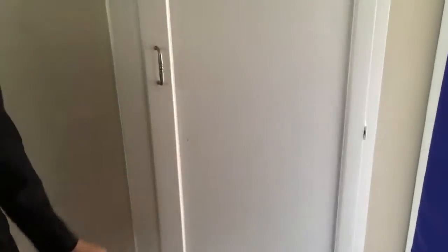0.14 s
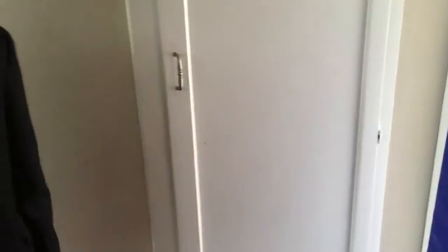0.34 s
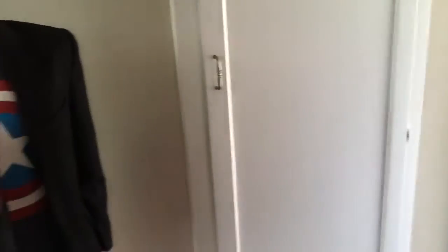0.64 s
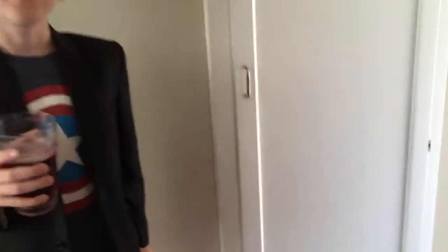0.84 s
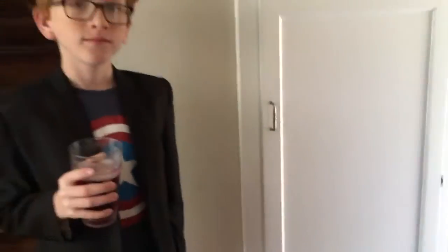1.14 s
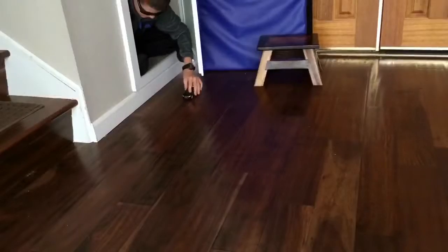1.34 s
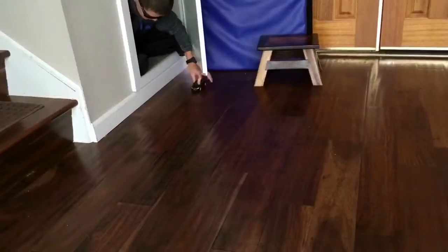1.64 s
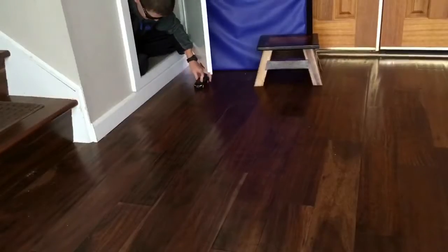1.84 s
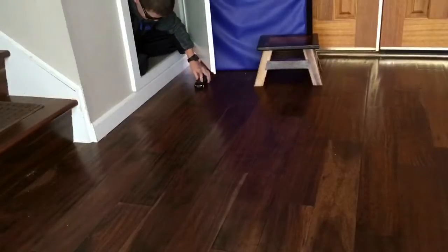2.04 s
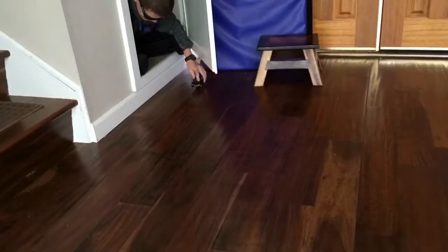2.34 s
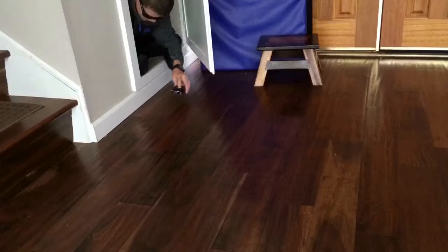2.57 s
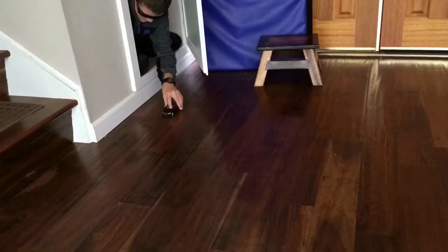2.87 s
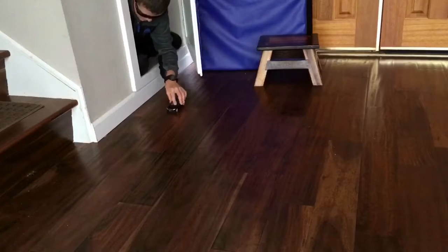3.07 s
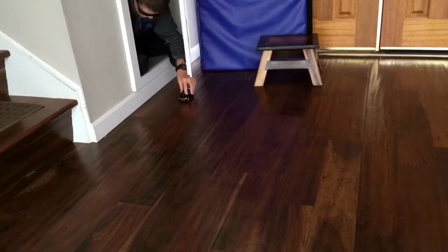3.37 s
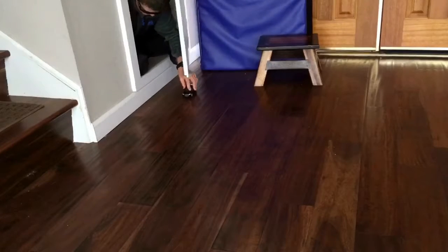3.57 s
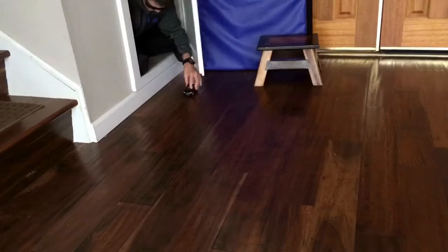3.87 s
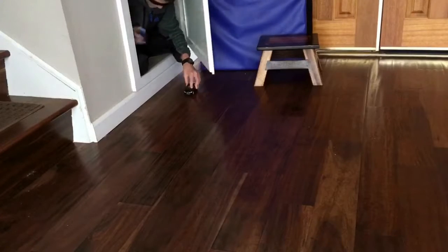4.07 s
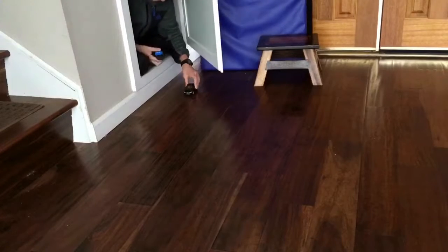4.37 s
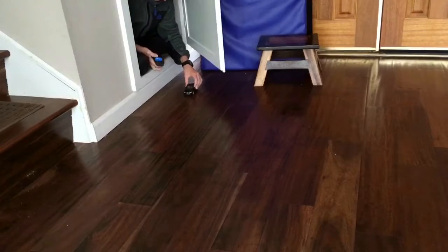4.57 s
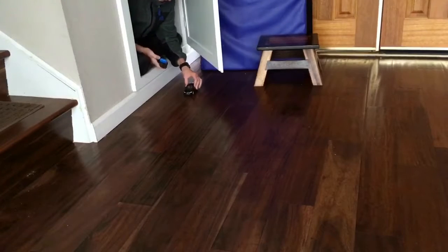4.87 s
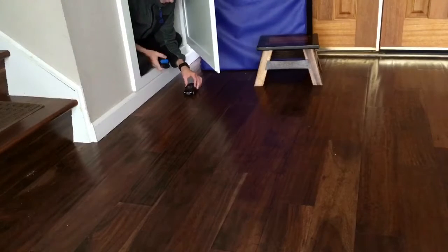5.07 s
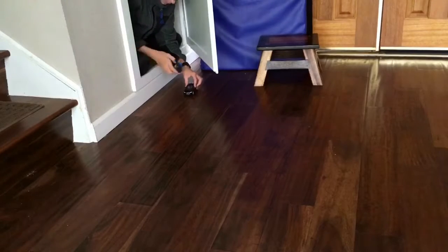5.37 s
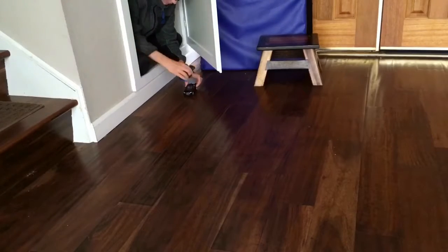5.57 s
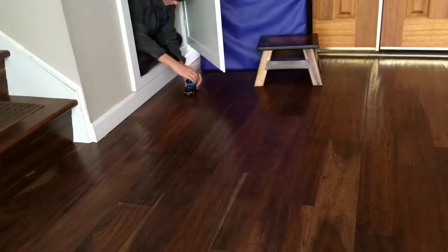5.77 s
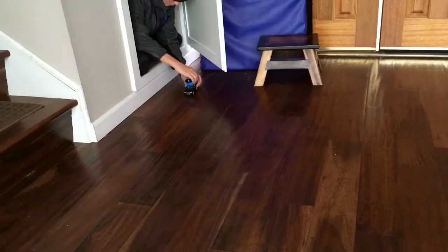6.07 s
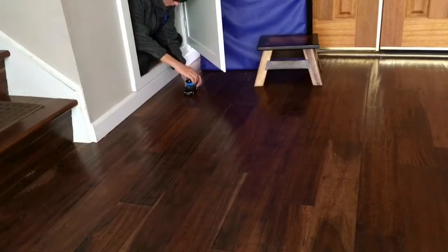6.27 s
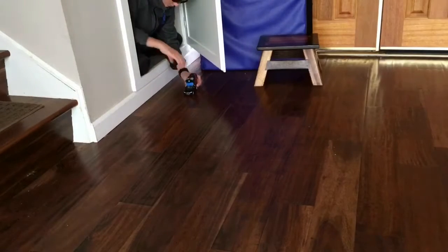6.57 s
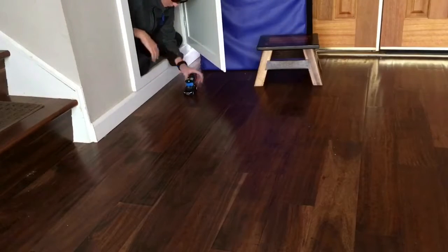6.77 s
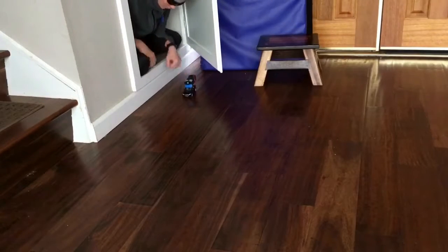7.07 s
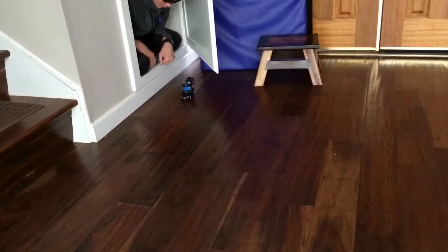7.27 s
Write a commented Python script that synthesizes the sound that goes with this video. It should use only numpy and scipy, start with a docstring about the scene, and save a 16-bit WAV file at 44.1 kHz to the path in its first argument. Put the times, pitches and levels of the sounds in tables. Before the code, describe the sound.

A cupboard door shuts with a click and a low thump, followed by a faint swish of movement. Close to the microphone, a small pull-back toy car is wound on a wooden floor: sharp plastic ratchet clicks come in short bursts, with light gear ticks and a soft whirr, ringing in a bare hallway. The ticks thin out over dull bumps, and a soft pop and brief faint hiss come near the end.

```python
"""Winding a toy car in a bare hallway

Close to one microphone, a pull-back car is wound up on the wooden floor: its ratchet snaps in short
bursts, its gears tick and whirr, and the hall rings on behind. Before that a cupboard door bumps shut
with a low thump and someone steps away. Dull bumps, a low rumble and a spell of hiss lie underneath."""
import sys
import numpy as np
from scipy import signal
from scipy.fft import rfft, irfft, next_fast_len
from scipy.io import wavfile
from scipy.ndimage import uniform_filter1d, minimum_filter1d

SR = 44100
rng = np.random.default_rng(int(sys.argv[2]) if len(sys.argv) > 2 else 0)


def bounce(signal):
    """Save signal as a 16-bit WAV file at the path given by the first command-line argument."""
    frames = np.transpose(np.atleast_2d(signal))
    limited = np.clip(frames, -1, 1)
    pcm = np.round(limited * 32767).astype(np.int16)
    wavfile.write(sys.argv[1], SR, pcm)


N = 327001
TIME = np.arange(N) / SR


def from_db(db):
    """Decibels to gain."""
    return 10 ** (np.asarray(db) / 20)


def fade(rows):
    """A (t/s, level/dB) curve as a gain, silent outside its span."""
    return from_db(np.interp(TIME, *np.transpose(rows), left=-140, right=-140))


def unit_rms(x):
    """Scale to unit power."""
    return x / np.sqrt(np.mean(x ** 2) + 1e-20)


def butter(x, hz, kind, order):
    """Causal Butterworth filter."""
    return signal.sosfilt(signal.butter(order, hz, kind, fs=SR, output="sos"), x)


def noise(colour):
    """Steady unit-power noise with an (f/Hz, level/dB) spectrum that falls away past its ends."""
    size = next_fast_len(N, real=True)
    hz = np.maximum(np.fft.rfftfreq(size, 1 / SR), 1)
    points_hz, points_db = np.transpose(colour)
    gain = from_db(np.interp(np.log(hz), np.log(points_hz), points_db))
    roll_off = (1 + (points_hz[0] / 2 / hz) ** 4) * (1 + (hz / points_hz[-1] / 2) ** 4)
    return unit_rms(irfft(rfft(rng.standard_normal(size)) * gain / roll_off, size)[:N])


def add(out, s, sound):
    """Mix a sound in at s seconds."""
    start = max(round(s * SR), 0)
    out[start:start + len(sound)] += sound[:max(N - start, 0)]


def swells(rows, attack_s, release_db_per_s):
    """Each (t/s, length/s, level/dB) rises, holds and dies away; their powers add."""
    power = 0
    for start, length, db in rows:
        rise = np.clip((TIME - start) / attack_s, 0, 1)
        fall_db = release_db_per_s * np.maximum(TIME - start - length, 0)
        power += (rise * from_db(db - fall_db)) ** 2
    return np.sqrt(power)


def struck_modes(s, db, hz, width_hz, decay_s):
    """A contact stirs a cluster of close modes that die away together."""
    out, t = np.zeros(N), TIME[:SR // 2]
    modes = butter(rng.standard_normal(len(t)), [hz - width_hz / 2, hz + width_hz / 2], "band", order=4)
    add(out, s, from_db(db) * unit_rms(modes) * np.exp(-t / decay_s))
    return out


# the hallway's air: t/s, level/dB; its spectrum: f/Hz, level/dB
AIR_FADE = [(0, -60.5), (1.2, -59.5), (1.3, -53.5), (7.4, -58)]
AIR_SPECTRUM = [(50, -17), (85, -8.5), (150, -14), (235, -16), (350, -26.5), (700, -29.5), (1800, -34),
                (3700, -40.5), (8000, -43.5), (15500, -40)]
def room_tone():
    """Faint, bass-heavy air all round the microphone."""
    return fade(AIR_FADE) * noise(AIR_SPECTRUM)


# movement by the cupboard: t/s, level/dB; its spectrum: f/Hz, level/dB
SWISH_FADE = [(0.2, -77), (0.4, -58), (0.8, -54), (1.0, -60), (1.22, -65)]
SWISH_SPECTRUM = [(150, -8.5), (290, 2), (520, -11.5), (900, -17.5), (2000, -44.5)]
def swish():
    """Someone moves away from the door with a dull swish."""
    return fade(SWISH_FADE) * noise(SWISH_SPECTRUM)


# a spell of hiss: t/s, level/dB; its spectrum: f/Hz, level/dB
HISS_FADE = [(6.51, -77), (6.52, -54.5), (6.9, -53.5), (7.27, -52), (7.3, -77)]
HISS_SPECTRUM = [(80, -16), (125, 8.5), (190, 1.5), (400, -12.5), (900, -11.5), (2700, -14), (6000, -17),
                 (11000, -23.5), (16000, -29)]
def hiss():
    """Hiss with a low drone in it comes in abruptly near the end."""
    return fade(HISS_FADE) * noise(HISS_SPECTRUM)


def pop(start_s=6.5166, db=-28.5, first_swing_s=.00005, slowing=0.293, decay_s=0.0082):
    """A soft pop opens the hiss, dropping from treble to bass within a few swings."""
    out, t = np.zeros(N), TIME[:SR // 8]
    phase = np.pi * (t / first_swing_s) ** slowing
    add(out, start_s, from_db(db) * np.sin(phase) * np.exp(-t / decay_s))
    return out


# thumps of door and floor: t/s, peak level/dB, f/Hz, swell/s
PANEL_THUMPS = [(0.136, -16, 54.7, 0.035), (1.202, -33.5, 55, 0.029), (3.847, -37, 60, 0.015),
                (5.189, -30, 62, 0.049), (6.517, -29, 41.7, 0.029), (6.596, -25, 49, 0.053),
                (6.714, -27.5, 37.2, 0.026), (6.812, -27.5, 45.7, 0.042), (6.91, -29.5, 41, 0.035)]
def thumps():
    """A heavy panel swings for a few cycles, swelling and dying."""
    out, t = np.zeros(N), TIME[:SR // 2]
    for s, db, hz, swell in PANEL_THUMPS:
        swing = (t / swell * np.exp(1 - t / swell)) ** 2
        add(out, s, from_db(db) * swing * np.sin(2 * np.pi * hz * t))
    return out


# weight shifting on the floor: t/s, length/s, level/dB; the floor's spectrum: f/Hz, level/dB
WEIGHT_SHIFTS = [(0.14, 0.057, -24.5), (0.35, 0.9, -40), (1.56, 0.078, -44.5), (2.18, 0.041, -53),
                 (2.88, 0.05, -48), (3.66, 0.14, -48), (4.22, 0.07, -41.5), (5.21, 0.063, -32.5),
                 (5.75, 0.079, -46), (6.39, 0.16, -40), (6.52, 0.42, -26.5), (7.27, 0.12, -38)]
FLOOR_SPECTRUM = [(20, -17.5), (35, -5), (58, 3), (80, -7), (110, -15.5), (200, -32)]
def floor_rumble(gain_db=-2, rest_db=-57, under_thump_db=-7):
    """The floor's fairly even rumble swells with each shift of weight and gives way to the thumps."""
    raw = noise(FLOOR_SPECTRUM)
    even = raw / np.sqrt(uniform_filter1d(raw ** 2, SR // 12))
    thumping = sum(np.exp(-((TIME - s - swell) / (2 * swell)) ** 2) for s, _, _, swell in PANEL_THUMPS)
    shifting = swells(WEIGHT_SHIFTS, attack_s=0.017, release_db_per_s=112.5)
    return even * np.hypot(from_db(rest_db), shifting) * from_db(gain_db + under_thump_db * thumping)


# knocks on wood, and one clink in a glass: t/s, level/dB, f/Hz, width/Hz, decay/s
WOOD_KNOCKS = [(0.146, -31.5, 150, 140, 0.061), (1.981, -48, 710, 496, 0.0083), (2.744, -47, 880, 420, .05),
               (2.875, -43.5, 152, 107.2, 0.045), (3.094, -43, 590, 600, 0.012),
               (3.362, -55, 745, 350, 0.055), (3.525, -48, 619, 320, 0.055),
               (3.782, -38, 180, 113.5, 0.035)]
GLASS_CLINK = (0.68, -62, 3500, 250, .015)
def knocks_and_clink():
    """Floor and cupboard give dull knocks; a glass rings once, faintly."""
    return sum(struck_modes(*row) for row in WOOD_KNOCKS) + struck_modes(*GLASS_CLINK)


# the cupboard's catch: t/s, level/dB; its spectrum: f/Hz, level/dB
LATCH_CLICKS = [(0.126, -44.5), (0.1485, -31.5), (0.1596, -43)]
LATCH_SPECTRUM = [(150, -34), (250, -10), (723, -16.5), (2530, -14), (3580, -18.5), (5440, -13.5),
                  (10400, -23), (13200, -14), (16000, -15.5)]
def latch(click_s=0.003, rattle_db=-13, rattle_s=0.045):
    """The catch clicks near the microphone and the door panel rattles briefly."""
    envelope, t = np.zeros(N), TIME[:SR // 3]
    decay = np.exp(-t / click_s) + from_db(rattle_db) * np.exp(-t / rattle_s)
    for s, db in LATCH_CLICKS:
        add(envelope, s, from_db(db) * decay)
    return envelope * noise(LATCH_SPECTRUM)


def split_bands(x, low_hz=2900, high_hz=10500):
    """Shell (the car's low modes), middle and treble bands."""
    edges = [(low_hz, "low"), ([low_hz, high_hz], "band"), (high_hz, "high")]
    return [butter(x, hz, kind, order=5) for hz, kind in edges]


def band_gains(contacts):
    """Gains per band for contacts: t/s, middle/dB, shell/dB and treble/dB re middle, room send/dB."""
    _, middle_db, shell_db, treble_db, _ = np.transpose(contacts)
    return from_db([middle_db + shell_db, middle_db, middle_db + treble_db])


# the hall's reverberation in the shell, middle and treble bands: T60/s
HALL_DECAYS = [0.72, 0.63, 0.47]
def hall_tail(contacts, tail_db=-4, build_s=0.0008, weak_modes_db=-9):
    """Every contact feeds the hall's diffuse tail, where the car's modes stand on a bed of weaker ones."""
    times, *_, send_db = np.transpose(contacts)
    starts = (times * SR).astype(int)
    bed = butter(rng.standard_normal(N), 1350, "high", order=3)
    washes = split_bands(car_body(rng.standard_normal(N)) + from_db(weak_modes_db) * bed)
    out, build = 0, np.exp(-1 / (build_s * SR))
    for wash, gains, t60 in zip(washes, band_gains(contacts), HALL_DECAYS):
        fed = np.bincount(starts, (gains * from_db(send_db + tail_db)) ** 2, N)
        kept_per_sample = from_db(-60 / (t60 * SR)) ** 2
        energy = signal.lfilter([1 - build], np.poly([build, kept_per_sample]), fed + 1e-18)
        out += unit_rms(wash) * np.sqrt(np.abs(energy))
    return out


# echoes, timed from the direct sound at the microphone: t/s, level/dB
NEAR_ECHOES = [(.0034, -6), (0.0085, -14), (0.01, -13)]
def near_walls(x, gain_db=5.0, t60_s=0.094, build_s=0.0036):
    """The floor and the nearest walls answer with a few echoes and a quick scatter."""
    t = TIME[:SR // 3]
    scatter = rng.standard_normal(len(t)) * from_db(-60 * t / t60_s) * (1 - np.exp(-t / build_s))
    response = scatter / np.linalg.norm(scatter)
    for delay, db in NEAR_ECHOES:
        response[round(delay * SR)] += from_db(db)
    return from_db(gain_db) * signal.fftconvolve(x, response)[:N]


# jolts to the chassis: t/s, level/dB; its rings: f/Hz, width/Hz, level/dB, decay/s
CHASSIS_JOLTS = [(2.874, 6), (4.001, 3), (4.321, -16), (4.476, -22), (4.704, -20), (4.927, -24)]
CHASSIS_RINGS = [(1650, 200, -42.5, .032), (2973, 410, -38, 0.06), (3970, 250, -43.5, 0.041),
                 (5430, 450, -37.5, .055), (11440, 1100, -40.5, 0.052)]
def chassis():
    """The chassis rings as the car is pressed to the floor."""
    return sum(struck_modes(s, jolt_db + db, hz, width, decay)
               for s, jolt_db in CHASSIS_JOLTS for hz, width, db, decay in CHASSIS_RINGS)


# modes of the plastic body: f/Hz, width/Hz, level/dB
BODY_MODES = [(1905, 413, 1), (2420, 550, 1.05), (3737, 273, 2), (4640, 620, -8), (5770, 1000, -6),
              (7280, 420, -5), (8190, 450, -7), (9350, 740, -6.5), (11330, 760, -6), (13590, 1800, -3.5),
              (14940, 1500, -4.5)]
def car_body(force, radiates_hz=1430):
    """Damped modes ring side by side in alternating polarity; so small a shell radiates little bass."""
    out = 0
    for k, (hz, width, db) in enumerate(BODY_MODES):
        radius = np.exp(-np.pi * width / SR)
        feedback = [1, -2 * radius * np.cos(2 * np.pi * hz / SR), radius ** 2]
        mode = (1 - radius ** 2) / 2 * signal.lfilter([1, 0, -1], feedback, force)
        out += (-1) ** k * from_db(db) * mode
    return butter(out, radiates_hz, "high", order=3)


def tooth_snaps(contacts, gain_db, chatter_s, lead_s=.0003):
    """Slipping teeth chatter on the body, one decay time a band; gives direct sound and room send."""
    direct, send, t = np.zeros(N), np.zeros(N), TIME[:SR // 50]
    for band, gains in enumerate(band_gains(contacts)):
        chatter = rng.choice([-1, 1], (len(contacts), len(t))) * t * np.exp(-t / chatter_s[band])
        rings = split_bands(car_body(chatter))[band]
        for (s, *_, send_db), ring, gain in zip(contacts, rings, gains):
            snap = from_db(gain_db) * gain * unit_rms(ring)
            add(direct, s - lead_s, snap)
            add(send, s - lead_s, from_db(send_db) * snap)
    return direct, send


# strokes of the hand that turn the gears: t/s, length/s, level/dB
HAND_STROKES = [(1.285, .16, -52.5), (1.45, .3, -59), (2.1, 0.29, -61.5), (2.745, 0.25, -61),
                (3.2, .35, -55.5), (3.7, 0.69, -56), (4.31, 0.04, -50.5)]
def gear_whirr(teeth_per_s=170, spread_db=5.0, rub_db=-16, gain_db=2.5):
    """Small teeth tap the body unevenly over a soft rubbing, and coast after each stroke."""
    taps = (rng.random(N) < teeth_per_s / SR) * from_db(spread_db * rng.standard_normal(N))
    rubbing = from_db(rub_db) * rng.standard_normal(N)
    mesh = butter(car_body(taps + rubbing), 5000, "low", order=1)
    return from_db(gain_db) * swells(HAND_STROKES, attack_s=.012, release_db_per_s=81.5) * unit_rms(mesh)


# ticks of gears and wheels: t/s, middle level/dB, brightness/dB
GEAR_TICKS = [(1.2284, -52.5, -8), (1.2861, -49, -1), (1.3532, -39.5, 1), (1.3753, -38, 3),
              (1.452, -38.5, 5), (1.4918, -45, -3), (1.521, -46.5, 7), (2.142, -38.5, 6), (2.338, -56, -10),
              (2.376, -42.5, -3.5), (2.4056, -47.5, -5), (2.5615, -60, -17), (2.693, -57.5, -13),
              (2.7825, -52.5, -4), (4.2834, -50, -4.5), (4.3217, -40.5, 2), (4.3963, -47.5, -2),
              (4.476, -47.5, -3.5), (4.703, -44.5, 0.5), (4.926, -44, 3), (5.2765, -51, 15),
              (5.527, -43, 2.5), (5.5903, -44.5, 7.5), (5.8867, -45, -1.5), (5.933, -44, 1),
              (6.279, -54, -4), (6.598, -57.5, 17), (6.833, -47.5, -2.5)]
def tick_contacts(shell_db=4, treble_db=-8, shell_loss=.55, send_db=-10):
    """A light contact favours the shell's low modes; a brighter one trades shell for treble."""
    return [(s, db, shell_db - shell_loss * bright, treble_db + bright, send_db)
            for s, db, bright in GEAR_TICKS]


# the ratchet, close up: t/s, middle level/dB, shell level/dB re middle, treble level/dB re middle
RATCHET_SNAPS = [(1.7306, -15.5, -4, 1), (1.7858, -20, -8.5, 2.5), (1.8621, -22, 1.5, 4.5),
                 (1.9783, -22, -3.5, 4), (2.8738, -22, -3, -2), (3.0944, -18, -8, 2.5),
                 (3.16, -17.5, -4, 4.5), (3.2042, -20, -5, 6.5), (3.2399, -16.5, -10, -2.5),
                 (3.283, -17, -1.5, -1.5), (3.3282, -17.5, -6.5, -3), (3.3615, -18.5, -0.5, -3),
                 (3.3978, -20.5, -6, -2), (3.4251, -19, -8, 2), (3.4614, -15, -3.5, -0.5),
                 (3.4981, -16, -6.5, -2), (3.5292, -18.5, -5.5, 2), (3.582, -17.5, -5, 1),
                 (3.8783, -17, -5, 1), (4.0016, -20.5, -1, 0)]
def ratchet_contacts(send_db=-9, shell_spread=.28):
    """Each tooth lands differently; the shell radiates all round, so more shell puts more in the room."""
    return [(s, db, shell, treble, send_db + shell_spread * shell)
            for s, db, shell, treble in RATCHET_SNAPS]


def scene():
    """From one spot in the hallway: the car up close, its echoes, the cupboard and the background."""
    snap_rows, tick_rows = ratchet_contacts(), tick_contacts()
    ratchet, ratchet_send = tooth_snaps(snap_rows, gain_db=-6.5, chatter_s=(.00075, .00065, .00058))
    ticks, tick_send = tooth_snaps(tick_rows, gain_db=-7.5, chatter_s=(.0011, .0009, .0006))
    room = near_walls(ratchet_send + tick_send) + hall_tail(snap_rows + tick_rows)
    car = ratchet + ticks + gear_whirr()
    background = room_tone() + swish() + hiss() + pop()
    bumps = latch() + thumps() + chassis() + knocks_and_clink()
    return (background + floor_rumble() + bumps + room + car)[None]


def record(dry, cutoff_hz=15900, ceiling=0.82):
    """After the microphone, the top is cut steeply and a quick limiter holds the sharpest snaps."""
    cut = signal.sosfilt(signal.ellip(10, .3, 80, cutoff_hz, fs=SR, output="sos"), dry)
    allowed_gain = np.minimum(1, ceiling / (np.abs(cut) + 1e-9))
    held_gain = minimum_filter1d(allowed_gain, size=SR // 400)
    return cut * uniform_filter1d(held_gain, size=SR // 400)


dry = scene()
out = record(dry)
bounce(out)
```